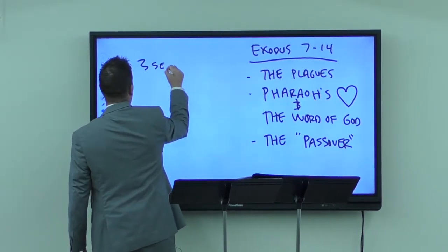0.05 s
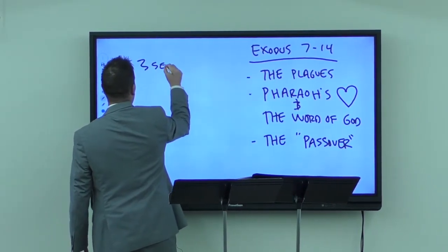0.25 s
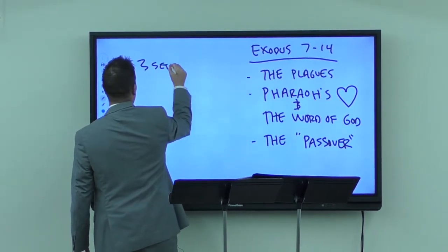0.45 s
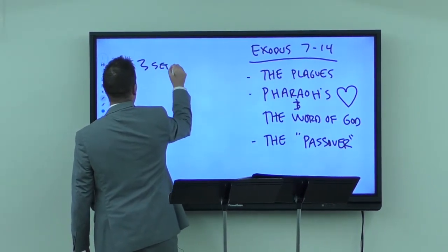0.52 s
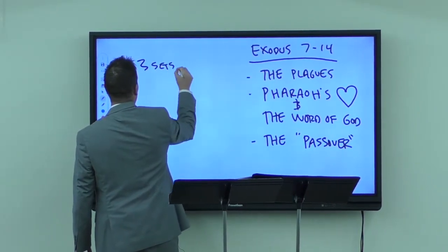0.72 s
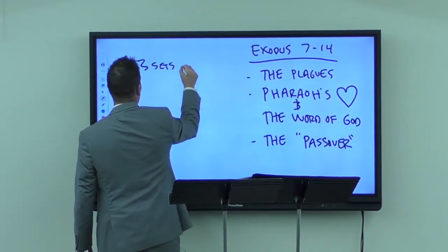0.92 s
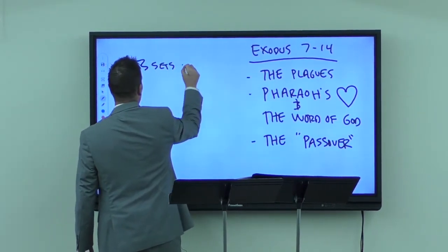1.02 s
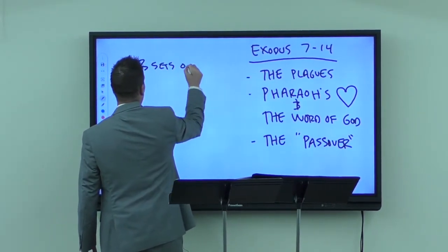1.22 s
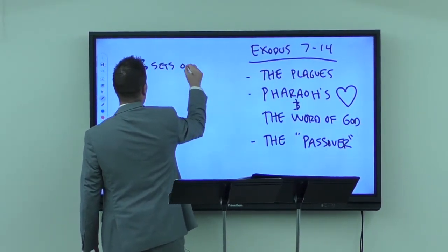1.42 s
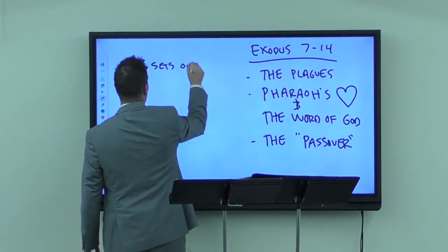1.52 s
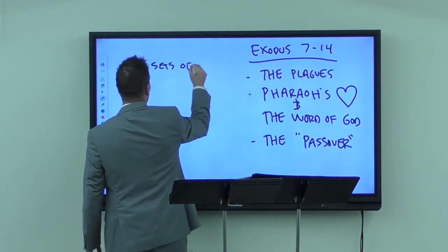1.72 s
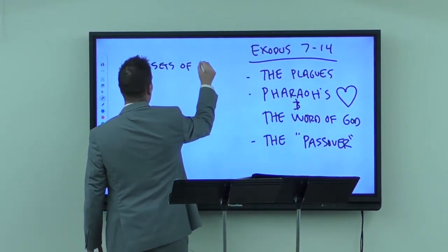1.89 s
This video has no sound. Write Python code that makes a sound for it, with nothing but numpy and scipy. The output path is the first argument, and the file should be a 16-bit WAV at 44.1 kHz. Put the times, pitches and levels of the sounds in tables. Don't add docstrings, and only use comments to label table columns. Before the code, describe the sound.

Crisp glassy clicks of a stylus on a wall display, irregularly spaced, one softer and a later one loudest, with slight frame rattle, short room echo and steady low fan rumble, heard by a distant microphone.

```python
import sys
import numpy as np
from scipy import signal
from scipy.io import wavfile

SR = 44100
rng = np.random.default_rng(int(sys.argv[2]) if len(sys.argv) > 2 else 0)


def how_loud(loudness_db):
    steps = np.asarray(loudness_db, float) / 20
    return 10 ** steps


def master(y):
    cut = np.clip(np.atleast_2d(y).T, -1, 1)
    pcm = np.round(cut * 32767)
    wavfile.write(sys.argv[1], SR, pcm.astype(np.int16))


N = 85995
LEAD = 8820

# (frequency [Hz], density [dB per Hz])
AIR_SPECTRUM = [(20, -3.5), (60, 0), (110, -3.5), (180, -17.5), (565, -19), (1700, -33), (6000, -41.5),
                (15800, -45.5)]
# (time [s], level [dB])
RUMBLE_SWELL = [
    (0, -51.5),
    (.2, -68),
    (.5, -52.5),
    (.75, -74),
    (1.0, -62.5),
    (1.4, -57.5),
    (1.75, -51),
    (1.86, -53.5),
    (1.95, -51),
]
# (frequency [Hz], level [dB], decay time t60 [s])
HALL_TAIL = [(57, 14, 1), (131.6, 5, 0.44), (292, 11.5, 0.36), (514, 0.5, 0.4), (1200, -1, 0.43),
             (3500, -0.5, 0.4), (7000, -19, 1), (13900, -5.5, 0.43)]
# (delay [s], level [dB], low cut [Hz])
WALL_ECHOES = [
    (0.0275, -42.5, 1200),
    (.043, -27, 500),
    (0.0877, -28, 3500),
]
# (time [s], level [dB], pitch [Hz], decay time t60 [s])
TIP_TOUCHES = [(0.656, -48.5, 3330, 0.0075), (.7472, -57, 3500, .04), (.7474, -57, 2300, .04),
               (.749, -57.5, 1410, 0.13), (.752, -57.5, 890, 0.21), (.772, -61.5, 3080, 0.046),
               (0.8, -61, 3400, 0.031), (0.767, -55, 1140, .08), (.79, -59, 1150, 0.14),
               (.811, -54, 1200, .03), (.858, -64, 3000, .006), (1.574, -71, 7000, .005),
               (1.578, -50, 12500, 0.0037), (1.852, -42, 805, 0.067), (1.854, -47, 1330, .03)]
TAP_TIMES = [-.080, .2293, .4320, .8995, 1.0302, 1.2151, 1.4752, 1.6584]
# (level [dB], place across the pane [0-1], tip hardness [dB], boxy ring [dB])
TAP_BLOWS = [
    (-25.5, 0.18, 2.5, 3),
    (-22, 0.18, 0.5, 4),
    (-23.5, 0.38, 0, 5),
    (-24, 0.55, 0.5, 4),
    (-29.5, 0.58, -4.5, 5.5),
    (-23, 0.75, 2, 5),
    (-21.5, 0.45, 1, 6.5),
    (-26, 0.48, 0, 4.5),
]
# (frequency [Hz], left [dB], middle [dB], right [dB], decay time t60 [s])
PANE_MODES = [(117, -13, -18, -31, 0.11), (151.2, -6.5, -11, -0.5, 0.064), (238.2, -23, -19.5, -14, 0.17),
              (308.4, -23, -31.5, -8, 0.24), (465.7, 4, -2, -11, 0.038), (576, 0, -3.9, 0, 0.044),
              (967, -16, -10.5, -9, 0.05), (1075, -21, 3, 4.5, 0.026), (1169.7, 7, -2.5, -7.5, 0.048),
              (1220, -47, -1.5, -6, 0.063), (1272, -12.5, -7, -1.5, 0.075), (1528, -22, -41, 0, 0.12),
              (2090, -39, -27, -5, 0.074), (516, 2.5, 2, -14, 0.023)]
# (frequency [Hz], left [dB], middle [dB], right [dB], decay time t60 [s])
COVER_MODES = [(2386, 0.5, -18, -3, 0.021), (2600, -14, -0.5, -4.5, 0.014), (2890, -21, 1.5, 7, 0.0089),
               (3400, -33, -4.5, -15.5, 0.0076), (3605, -19.5, -5, -35, 0.024), (4196, -11, -9, -20, 0.018),
               (4650, -10, -9, -19, 0.0093), (5615, -12, -4.5, -15, 0.02), (6116, -5, -5, -19, 0.013),
               (7900, 24, -49, -19, 0.0023), (8620, -17, -7, -41, 0.0065), (9370, -39, -59, -29, 0.0087),
               (11200, -40, -29, -21, 0.0032), (13500, -47, -73, -24, .004)]
# (frequency [Hz], density [dB per Hz])
CRACK_SPECTRUM = [(800, 6.5), (2800, 9), (4300, 4), (5200, 2), (6200, 7.5), (8000, -2.5), (11000, -7),
                  (16000, -22)]

AIR_DB, AIR_TOP_HZ = -53, 16000
FAN_DB, FAN_HZ, FAN_WIDTH_HZ = -61, 57.5, 9
RUMBLE_LOW_HZ, RUMBLE_HIGH_HZ = 83, 423
HALL_DB, HALL_RISE_S, ECHO_T60_S = -14.5, 0.004, 0.0066
TOUCH_Q, TOUCH_RISE_S = 4.5, 0.0005
TRAVEL_S_AT_1K, RISE_CYCLES, MODE_SPREAD_DB = 0.00036, 0.1, 2.13
CRACK_DB, CRACK_T60_S, CRACK_CYCLES = -23, 0.006, 22
RATTLE_DB, RATTLE_T60_S, RATTLE_RISE_S = -11.5, 0.04, 0.0057
BLOOM_DB, BLOOM_DELAY_S, BLOOM_T60_S = -27, 0.023, 0.074
TAPS_LOW_CUT_HZ = 95


def rms_one(x):
    return x / np.sqrt(np.mean(x ** 2) + 1e-20)


def at_hz(points, hz, axis=1):
    table = np.array(points)
    return np.interp(np.log(hz), np.log(table[:, 0]), table[:, axis])


def filtered(x, edges_hz, kind):
    return signal.sosfilt(signal.butter(2, edges_hz, kind, fs=SR, output="sos"), x)


def bands(size, low_hz):
    settle = 4000
    edges = low_hz * 2 ** np.arange(0, np.log2(20000 / low_hz), 1 / 3)
    white = rng.standard_normal((2, size + settle))
    for k, (low, high) in enumerate(zip(edges, edges[1:])):
        yield np.sqrt(low * high), filtered(white[k % 2], [low, high], "band")[settle:]


def dying(t, t60):
    return (t > 0) * how_loud(-60 * np.maximum(t, 0) / t60)


def add(out, s, sound):
    i = int(s * SR) + LEAD
    out[i:i + len(sound)] += sound[:len(out) - i]


def air():
    wash = rms_one(sum(how_loud(at_hz(AIR_SPECTRUM, hz)) * noise for hz, noise in bands(size=N, low_hz=18)))
    wash = signal.sosfilt(signal.cheby2(16, 50, AIR_TOP_HZ, fs=SR, output="sos"), wash)
    white = rng.standard_normal((2, N + SR))
    b, a = signal.iirpeak(FAN_HZ, FAN_HZ / FAN_WIDTH_HZ, fs=SR)
    fan = signal.lfilter(b, a, white[0])[SR:]
    rumble = filtered(white[1], [RUMBLE_LOW_HZ, RUMBLE_HIGH_HZ], "band")[SR:]
    swell = how_loud(np.interp(np.arange(N) / SR, *np.transpose(RUMBLE_SWELL)))
    return how_loud(AIR_DB) * wash + how_loud(FAN_DB) * rms_one(fan) + swell * rms_one(rumble)


def hall(x):
    t = np.arange(SR) / SR
    tail = np.zeros(SR)
    for hz, noise in bands(size=SR, low_hz=45):
        tail += how_loud(at_hz(HALL_TAIL, hz)) * noise * dying(t, at_hz(HALL_TAIL, hz, axis=2))
    build_up = 1 - np.exp(-(t / HALL_RISE_S) ** 2)
    response = how_loud(HALL_DB) * tail * build_up / np.sqrt(SR) * 10
    for delay, db, cut_hz in WALL_ECHOES:
        smear = rng.standard_normal(SR) * dying(t - delay, ECHO_T60_S)
        smear = filtered(smear, cut_hz, "high")
        response += how_loud(db) * smear / np.sqrt(np.sum(smear ** 2))
    return signal.fftconvolve(x, response)[:len(x)]


def touches():
    out, t = np.zeros(N + LEAD), np.arange(4000) / SR
    for s, db, hz, t60 in TIP_TOUCHES:
        b, a = signal.iirpeak(hz, TOUCH_Q, fs=SR)
        scuff = signal.lfilter(b, a, rng.standard_normal(len(t)))
        scuff = signal.lfilter(b, a, scuff)
        onset = 1 - np.exp(-t / TOUCH_RISE_S)
        add(out, s, how_loud(db) * rms_one(scuff) * dying(t, t60) * onset)
    return out


def hardness_tilt_db(hard_db, hz):
    return hard_db * np.log2(hz / 1000) / 2


def glass_modes(t, place, hard_db, box_db):
    sound = np.zeros(len(t))
    for k, (hz, *place_db, t60) in enumerate(PANE_MODES + COVER_MODES):
        u = t - TRAVEL_S_AT_1K * np.sqrt(1000 / hz)
        level_db = np.interp(place, [0, 0.5, 1], place_db) + MODE_SPREAD_DB * rng.standard_normal()
        if hz > 1800:
            level_db += hardness_tilt_db(hard_db, hz)
        elif hz < 700:
            level_db += box_db
        sign = 1 if 700 < hz < 1800 else -(-1) ** k
        onset = 1 - np.exp(-np.maximum(u, 0) * hz / RISE_CYCLES)
        sound -= how_loud(level_db) * sign * dying(u, t60) * onset * np.sin(2 * np.pi * hz * u)
    return sound


def crack_and_rattle(t, t0, hard_db):
    rattle = how_loud(RATTLE_DB) * dying(t0, RATTLE_T60_S) * (1 - np.exp(-t / RATTLE_RISE_S))
    rattle += how_loud(BLOOM_DB) * dying(t0 - BLOOM_DELAY_S, BLOOM_T60_S)
    sound = np.zeros(len(t))
    for hz, noise in bands(size=len(t), low_hz=750):
        level_db = CRACK_DB + hardness_tilt_db(hard_db, hz) + at_hz(CRACK_SPECTRUM, hz)
        crack = dying(t0, CRACK_T60_S + CRACK_CYCLES / hz)
        sound += how_loud(level_db) * 10 * noise * (crack + rattle)
    return sound


def taps():
    out, t = np.zeros(N + LEAD), np.arange(8000) / SR
    for s, (db, place, hard_db, box_db) in zip(TAP_TIMES, TAP_BLOWS):
        t0 = t - s * SR % 1 / SR
        sound = glass_modes(t0, place, hard_db, box_db) + crack_and_rattle(t, t0, hard_db)
        add(out, s, how_loud(db) * sound)
    return filtered(out + 1e-18, TAPS_LOW_CUT_HZ, "high")


def scene():
    tip = taps() + touches()
    return ((tip + hall(tip))[LEAD:] + air())[None]


def band_limit(x):
    return signal.sosfilt(signal.butter(12, 16540, fs=SR, output="sos"), x)


def record(dry):
    mix = signal.sosfilt(signal.cheby2(16, 60, 16750, fs=SR, output="sos"), dry)
    return band_limit(mix)


dry = scene()
out = record(dry)
master(out)
```